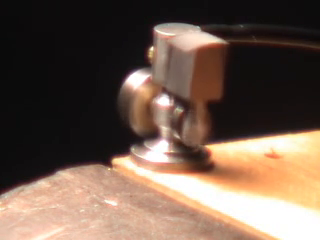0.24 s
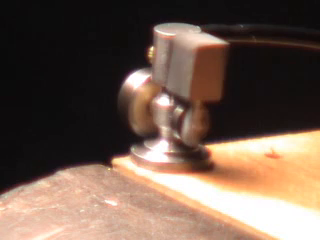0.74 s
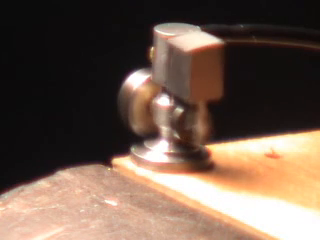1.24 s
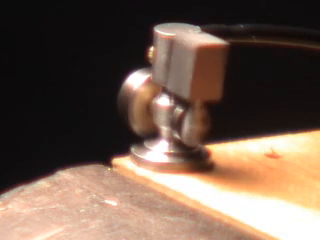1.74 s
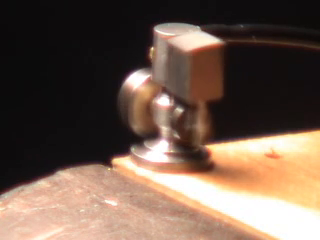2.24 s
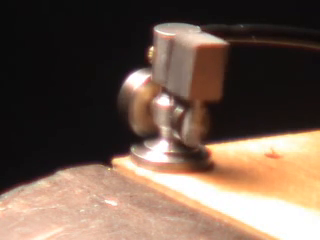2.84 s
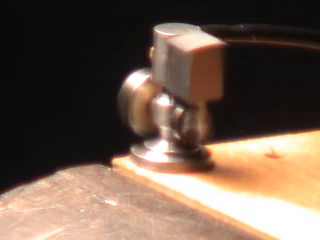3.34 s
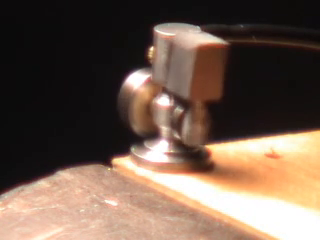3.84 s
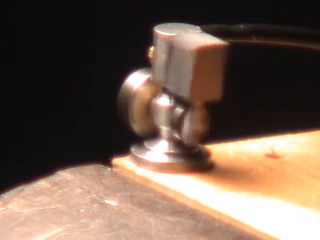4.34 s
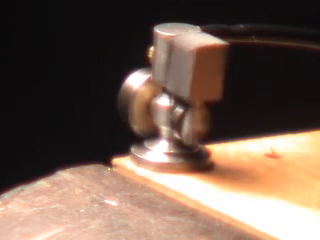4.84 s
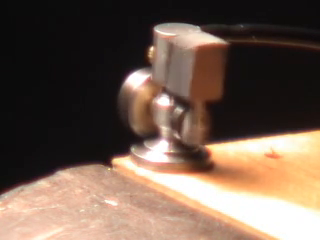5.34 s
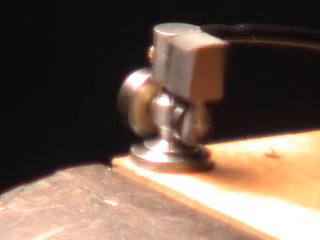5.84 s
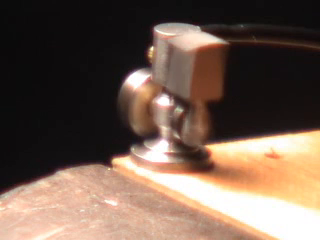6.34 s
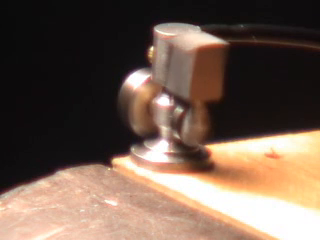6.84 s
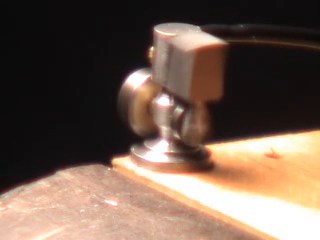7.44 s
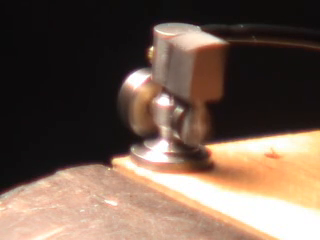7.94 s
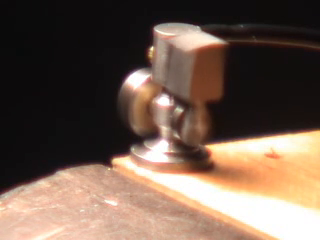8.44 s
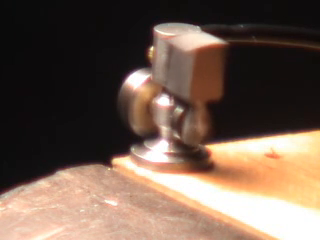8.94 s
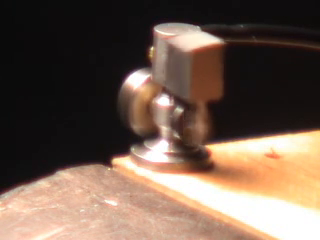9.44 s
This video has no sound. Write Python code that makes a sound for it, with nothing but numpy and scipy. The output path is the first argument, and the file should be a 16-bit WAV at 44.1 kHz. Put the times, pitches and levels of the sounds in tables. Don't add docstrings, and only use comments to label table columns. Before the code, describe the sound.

Close, rapid metallic whirr and gritty hiss of a miniature engine, with a small compressor throbbing until midway, then rising pitch and a quick closing slowdown.

```python
import sys
import numpy as np
from scipy import signal
from scipy.fft import rfft, irfft, next_fast_len
from scipy.io import wavfile
from scipy.ndimage import uniform_filter1d

SR = 44100
rng = np.random.default_rng(int(sys.argv[2]) if len(sys.argv) > 2 else 0)


def unload_wav(signal):
    wavfile.write(
        sys.argv[1],
        SR,
        np.round(np.clip(np.atleast_2d(signal).T, -1, 1) * 32767).astype(np.int16),
    )


def decibels_to_gain(level_db):
    exponent = np.asarray(level_db, float) / 20
    return 10 ** exponent


N = 427329

# start_s [s], speed [turns per s]
SHAFT_SPEED = [(0, 61.24), (0.6, 61.41), (1.4, 60.87), (2.4, 61.1), (2.6, 59.75), (2.8, 61.34),
               (3.2, 61.17), (3.6, 60.8), (4.6, 62.1), (5.0, 61.42), (5.2, 61.9), (5.8, 69.02), (7.6, 78.0),
               (7.8, 79.13), (9, 82.9), (9.2, 78.86), (9.4, 72.09), (9.69, 55.96)]
# start_s [s], knock_db [dB], exhaust_db [dB]
ENGINE_EFFORT = [(0, -25.5, -30), (2.36, -25, -30.5), (2.41, -17.5, -33.5), (2.6, -22.5, -32),
                 (2.68, -23.5, -31), (3.37, -24, -31.5), (3.45, -18.5, -32), (3.6, -22.5, -31.5),
                 (4.2, -20.5, -33), (5.0, -20.5, -33.5), (5.9, -21.5, -31.5), (6.05, -24.5, -32),
                 (6.2, -23.5, -30), (7.7, -20.5, -30), (7.85, -23.5, -29), (8.7, -22, -30), (9.4, -24, -30),
                 (9.69, -24, -32.5)]
# pitch_hz [Hz], width_hz [Hz], knock_db [dB], tick_db [dB]
FRAME_MODES = [(2830, 145, -6, 4.5), (3016, 58, -12.5, -25), (3498, 125, -5, 6), (3800, 86, -4, 3),
               (4324, 264, 6, -3), (4910, 310, -1.5, 6), (5694, 300, -0.5, 5), (5770, 180, -42, -79)]
# pitch_hz [Hz], width_hz [Hz], level_db [dB]
PORT_MODES = [(6080, 1450, -3.5), (7200, 1100, -11.5), (7500, 750, -9), (8384, 120, -1), (9310, 300, 2),
              (10110, 290, 4), (11440, 640, -7), (11460, 720, -32)]
# position [turns], level_db [dB]
PORT_OPENING = [(-.5, -27), (-.3, -19), (-.2, -7), (-.11, 1.5), (-.04, 0), (.08, -2), (.18, -8), (.27, -17),
                (.5, -27)]
# pitch_hz [Hz], width_hz [Hz], knock_db [dB], tick_db [dB]
BENCH_MODES = [(1381, 200, 14.5, 11), (1776, 250, 12.5, 18.5), (2260, 84, 10, -4)]
# start_s [s], level_db [dB above the usual]
HEAVY_KNOCKS = [
    (5.219, 4),
    (5.282, 4),
    (5.345, 4),
    (5.696, 4),
    (5.768, 4),
    (5.855, 4),
    (5.97, 5),
    (5.999, 5),
]
# pitch_hz [Hz], t60_s [s], level_db [dB], polarity [sign]
INTAKE_MODES = [(190, 0.058, -39.0, -1), (303, 0.08, -31.0, -1), (401, 0.299, -23.4, 1),
                (439, 0.298, -20.3, 1), (512, 0.045, -16.6, -1), (575, 0.259, -24.5, 1),
                (624, 0.283, -18.0, -1), (734, 0.047, -18.1, -1), (800, 0.06, -17.2, -1),
                (907, 0.109, -39.9, 1), (939, 0.17, -21.3, 1), (1089, 0.085, -29.5, 1)]
# pitch_hz [Hz], level_db [dB per Hz]
RATTLE_SPECTRUM = [(200, -29), (350, -28), (1000, -9.5), (1440, -8), (1950, -9), (2700, -8.5),
                   (3350, -15.5), (5740, -7), (7080, -15.5), (9000, -13.5), (11500, -26), (14000, -60)]
# pitch_hz [Hz], width_hz [Hz], level_db [dB]
CASING_MODES = [(564, 40, -11.5), (660, 210, 2.5), (980, 260, -11), (1065, 320, -8), (1573, 52, -6.5),
                (2106, 78, -4.5), (2830, 70, 2), (3020, 120, -3), (2655, 160, 0)]
# position [turns], level_db [dB]
VALVE_JOLTS = [(-.16, 3.4), (.06, 5.5), (.24, 2.8), (.5, 3.7), (.74, 3.4)]
# start_s [s], level_db [dB below running]
COAST_DOWN = [
    (5.04, -6.5),
    (5.07, -11),
    (5.12, -10),
    (5.17, -24.5),
    (5.25, -24),
    (5.35, -62),
]
# start_s [s], level_db [dB], pitch_hz [Hz]
RUN_DOWN_KNOCKS = [
    (5.04, -14, 2830),
    (5.058, -14, 944),
    (5.08, -21, 1085),
    (5.103, -15.5, 985),
    (5.105, -18.5, 490),
    (5.225, -34, 660),
]
# pitch_hz [Hz], level_db [dB per Hz]
FLOOR_SPECTRUM = [(29, -31), (50, 4.5), (83, 3.5), (124, -4.5), (310, 1), (352, -2), (1100, -7.5),
                  (1430, -93), (2420, -120)]
# pitch_hz [Hz], level_db [dB rms]
MOTOR_HUM = [(75.4, -52.5), (150.7, -71)]
# start_s [s], level_db [dB above the rumble]
DRAUGHTS = [(3.62, 5), (4.3, 3), (4.78, 6), (5.78, 4), (5.99, 5)]
# band_top_hz [Hz], dropped [share of time], apart [share with left and right apart]
PATCHY_BANDS = [(1000, 0, 0), (3400, .0, .22), (4700, 0, .4), (6100, .003, .45), (6800, .04, .45),
                (7500, .16, .45), (9600, .01, .5), (10700, .03, .5), (11500, .4, .55), (12200, .4, .55),
                (12800, .6, .55), (13400, .94, .4), (16000, .985, .1)]

USUAL_TURNS_PER_S = 72
LEFT_DB = -18


def rms_one(x):
    return x / np.sqrt(np.mean(x ** 2) + 1e-20)


def in_time(rows):
    s, *columns = np.transpose(rows)
    return [np.interp(np.arange(N) / SR, s, c) for c in columns]


def drift(rate_hz):
    r = np.exp(-80 * np.pi * rate_hz / SR)
    slow = signal.lfilter([1], [1, -2 * r, r * r], rng.standard_normal(N // 40 + 2002))[2000:]
    return np.interp(np.arange(N) / 40, np.arange(len(slow)), rms_one(slow))


def above(x, hz, order):
    return signal.sosfilt(signal.butter(order, hz, "high", fs=SR, output="sos"), x)


def band_pass(x, low_hz, high_hz):
    return signal.sosfilt(signal.butter(2, [low_hz, high_hz], "band", fs=SR, output="sos"), x)


def resonance(x, hz, width_hz):
    r = np.exp(-np.pi * width_hz / SR)
    return signal.lfilter([(1 - r * r) / 2, 0, (r * r - 1) / 2], [1, -2 * r * np.cos(2 * np.pi * hz / SR), r * r], x)


def excite(x, modes, width_power=.5):
    return sum(decibels_to_gain(db) * resonance(x, hz, width) / width ** width_power for hz, width, db in modes)


def coloured(spectrum, channels):
    hz, level_db = np.transpose(spectrum)
    size = next_fast_len(N)
    log_hz = np.log(np.arange(size // 2 + 1) * SR / size + 1)
    shape = decibels_to_gain(np.interp(log_hz, np.log(hz), level_db, left=-80, right=-80))
    return rms_one(irfft(rfft(rng.standard_normal((channels, size))) * shape, size)[:, :N])


def contacts(turns, jitter_s):
    at = np.flatnonzero(np.diff(np.floor(turns)) > 0)
    jitter = np.round(jitter_s * SR * rng.standard_normal(len(at))).astype(int)
    return np.clip(at + jitter, 0, N - 1)


def strike(at, gain, modes, scatter_db, size=1):
    out, luck = np.zeros(N), rng.standard_normal((len(at), len(modes)))
    late = rng.integers(0, size, (len(at), len(modes)))
    for k, (hz, width_hz, level_db) in enumerate(modes):
        clicks = np.full(N, 1e-18)
        strength = gain * decibels_to_gain(level_db + scatter_db * luck[:, k])
        clicks[np.minimum(at + late[:, k], N - 1)] = strength / np.sqrt(width_hz)
        out += resonance(clicks, hz, width_hz)
    return out


def knock_strengths(knocks):
    spread_db = np.where(knocks < 6.2 * SR, 2.2, 1.2)
    blow = decibels_to_gain(spread_db * np.clip(rng.standard_normal(len(knocks)), -2, 1.5))
    for s, extra_db in HEAVY_KNOCKS:
        blow[np.argmin(np.abs(knocks - s * SR))] = decibels_to_gain(extra_db)
    return blow


def exhaust_jet(turns):
    gust = decibels_to_gain(1.8 * rng.standard_normal(int(turns[-1]) + 2))[(turns + .5).astype(int)]
    opening_db = np.interp((turns + .5) % 1 - .5, *np.transpose(PORT_OPENING))
    return gust * decibels_to_gain(opening_db) * rng.standard_normal(N)


def frame_metal(knocks, blow, ticks, rub, knock_db, tick_db, octaves):
    frame = np.array(FRAME_MODES)
    body, heavy_base = frame[4:, :3], frame[:4, :3]
    knock = rms_one(strike(knocks + 3, blow, body, scatter_db=1.3, size=5))
    base = rms_one(strike(knocks + 3, 1, heavy_base, scatter_db=1.5, size=7))
    tick = rms_one(strike(ticks, 1, frame[:, [0, 1, 3]], scatter_db=2.2, size=14))
    scrape = rms_one(excite(rub, frame[:, :3]))
    base_db = -28.5 + 9.5 * octaves + 0.27 * drift(6.6)
    metal = decibels_to_gain(knock_db) * (decibels_to_gain(-2.5) * knock + decibels_to_gain(-6.5) * scrape)
    return metal + decibels_to_gain(tick_db) * tick + decibels_to_gain(base_db) * base


def exhaust(knocks, blow, jet):
    crack = rms_one(strike(knocks, blow ** .3, PORT_MODES, scatter_db=2, size=7))
    hiss = rms_one(excite(jet, PORT_MODES))
    return decibels_to_gain(5) * crack + decibels_to_gain(4) * hiss


def bench_board(turns, rub, speed):
    bench = np.array(BENCH_MODES)
    down, up = contacts(turns - .035, jitter_s=0), contacts(turns + .5, jitter_s=0)
    ring = strike(down, -1, bench[:, :3], scatter_db=1.2)
    ring = rms_one(ring + strike(up, .65, bench[:, [0, 1, 3]], scatter_db=1.5))
    ring += decibels_to_gain(-6.5) * rms_one(excite(rub, bench[:, :3], width_power=0))
    push = np.zeros(N)
    push[down] = -decibels_to_gain(drift(1.5)[down])
    thump = rms_one(band_pass(push, 170, 870))
    thump_db = -44 + 7.5 * np.log2(np.maximum(speed / USUAL_TURNS_PER_S, .8))
    return decibels_to_gain(-37.5) * ring + decibels_to_gain(thump_db) * above(thump, 190, order=2)


def engine():
    speed, = in_time(SHAFT_SPEED)
    turns = np.cumsum(speed) / SR + .012 * drift(4) - .436 + 1
    octaves = np.log2(speed / USUAL_TURNS_PER_S)
    knock_db, exhaust_db = in_time(ENGINE_EFFORT)
    tick_db = -35 + .6 * (exhaust_db - exhaust_db.mean()) + 1.2 * drift(4.2)
    knocks = contacts(turns, jitter_s=.00005)
    ticks = contacts(turns + .52, jitter_s=.00015)
    blow = knock_strengths(knocks)
    jet = exhaust_jet(turns)
    rub = jet + 0.31 * rng.standard_normal(N)
    metal = frame_metal(knocks, blow, ticks, rub, knock_db, tick_db, octaves)
    air = decibels_to_gain(exhaust_db) * exhaust(knocks, blow, jet)
    return above(metal + air, 2450, order=5) + bench_board(turns, rub, speed)


def compressor_throb(turns):
    throb, strokes = np.zeros(N), contacts(turns, jitter_s=.00006)
    strokes = strokes[strokes < 5.045 * SR]
    rebounds = strokes + int(.00582 * SR)
    luck = rng.standard_normal((len(strokes), len(INTAKE_MODES)))
    for k, (hz, t60_s, level_db, polarity) in enumerate(INTAKE_MODES):
        clicks = np.full(N, 1e-18)
        clicks[strokes] = polarity * decibels_to_gain(level_db + 2.2 + .3 * luck[:, k])
        clicks[rebounds] = decibels_to_gain(-4) * clicks[strokes]
        r, w = decibels_to_gain(-60 / (t60_s * SR)), 2 * np.pi * hz / SR
        throb += signal.lfilter([0, np.sin(w)], [1, -2 * r * np.cos(w), r * r], clicks)
    return throb


def compressor_rattle(turns):
    shake = decibels_to_gain(0.16 * np.cos(2 * np.pi * turns)) * rng.standard_normal(N)
    casing = np.sqrt(SR) * excite(shake, CASING_MODES)
    rattle = decibels_to_gain(7.5) * coloured(RATTLE_SPECTRUM, channels=1)[0] + decibels_to_gain(-4.5) * casing
    jolt_db = np.zeros(N)
    for at, db in VALVE_JOLTS:
        from_jolt = (turns - at + .5) % 1 - .5
        jolt_db += db * np.exp(-(from_jolt / .088) ** 2)
    return rattle * decibels_to_gain(-27.5 + jolt_db + in_time(COAST_DOWN)[0])


def run_down():
    t, knocks = np.arange(N) / SR, np.zeros(N)
    for s, level_db, hz in RUN_DOWN_KNOCKS:
        since = np.maximum(t - s, 0)
        knocks += decibels_to_gain(level_db - 700 * since) * np.sin(2 * np.pi * hz * since)
    return knocks


def compressor():
    strokes_per_s = 37.81 - .1047 * np.arange(N) / SR
    turns = np.cumsum(strokes_per_s) / SR - .805 + 1
    return above(compressor_throb(turns) + compressor_rattle(turns), 170, order=1) + run_down()


def room(x):
    t60_s, wall_cut_hz = 0.16, 4000
    t = np.arange(SR // 4) / SR
    tail = rng.standard_normal(len(t)) * decibels_to_gain(-60 * t / t60_s) * (t > .003)
    tail = signal.sosfilt(signal.butter(1, wall_cut_hz, fs=SR, output="sos"), tail)
    return decibels_to_gain(-15.5) * signal.fftconvolve(x, tail / np.sqrt(np.sum(tail ** 2)))[:N]


def background():
    t, apart = np.arange(N) / SR, np.array([[1], [-1]])
    one, other = coloured(FLOOR_SPECTRUM, channels=2)
    floor = decibels_to_gain(-47) * (one + decibels_to_gain(-5) * other * apart)
    hum = sum(decibels_to_gain(db) * np.sqrt(2) * np.sin(2 * np.pi * hz * t) for hz, db in MOTOR_HUM)
    air, eddy = band_pass(rng.standard_normal((2, N)), 8, 35)
    rumble = rms_one(air) * decibels_to_gain(np.array([[-3.5], [2.5]])) + decibels_to_gain(-9) * rms_one(eddy) * apart
    gusts_db = sum(db * np.exp(-((t - s) / .05) ** 2) for s, db in DRAUGHTS)
    calm_db = -6 * (t > 7.75)
    return floor + hum + decibels_to_gain(-52 + calm_db + 2.2 * drift(2.4) + gusts_db) * rumble


def short_gaps(x):
    treble = signal.sosfiltfilt(signal.butter(6, 4900, "high", fs=SR, output="sos"), x)
    power = treble[0] ** 2
    faint = uniform_filter1d(power, size=128) < decibels_to_gain(-9.5) ** 2 * uniform_filter1d(power, size=1024)
    chosen = np.repeat(rng.random(N // 512 + 1) < .55, 512)[:N]
    return x - (1 - decibels_to_gain(LEFT_DB)) * uniform_filter1d(1.0 * (faint & chosen), size=48) * treble


def patchy_treble(x):
    hz, s, parts = signal.stft(x, SR, nperseg=512)
    top_hz, dropped, apart = np.transpose(PATCHY_BANDS)
    band = np.minimum(np.searchsorted(top_hz, hz), len(top_hz) - 1)
    chance = rng.standard_normal((3, len(top_hz), len(s)))
    chance = uniform_filter1d(chance, size=8, axis=2) * np.sqrt(8)
    weak_first, high = .4, top_hz[:, None] > 10000
    top = np.log(np.sum(np.abs(parts[0, hz > 9000]) ** 2, axis=0) + 1e-12)
    weak = weak_first * rms_one(top - uniform_filter1d(top, size=40)) * high
    rank = 1 / (1 + np.exp(-1.7 * (chance + weak) / np.sqrt(1 + weak_first ** 2 * high)))
    kept = (rank[0] > dropped[:, None])[band]
    keep = np.maximum(kept, decibels_to_gain(LEFT_DB) * (hz[:, None] < 10000))
    together = 1 / (1 + np.exp(-1.2 * (chance[1] + chance[2, :1])))
    noisy = (together < apart[:, None])[band]
    grain_db = -19.5 + 7 * (hz[:, None] / 12000) ** 3
    phase = np.exp(2j * np.pi * rng.random(rank[0].shape))[band]
    grain = decibels_to_gain(grain_db) * noisy * parts.mean(axis=0) * phase
    parts = (parts + grain * np.array([1, -1])[:, None, None]) * keep
    return signal.istft(parts, SR, nperseg=512)[1][:, :N]


def scene():
    machines = engine() + compressor()
    return machines + room(above(machines, 1200, order=2)) + background()


def top_cut(x):
    return signal.sosfilt(signal.butter(12, 13970, fs=SR, output="sos"), x)


def record(dry):
    soft = 1.05 * np.tanh(dry / 1.05)
    mix = patchy_treble(short_gaps(soft))
    return top_cut(mix)


dry = scene()
out = record(dry)
unload_wav(out)
```